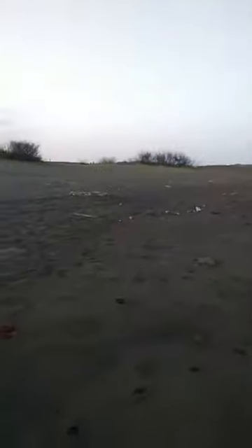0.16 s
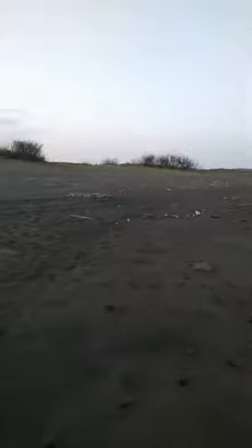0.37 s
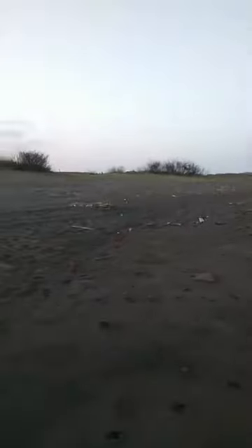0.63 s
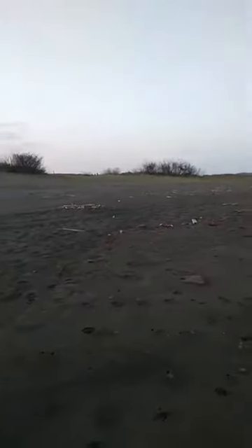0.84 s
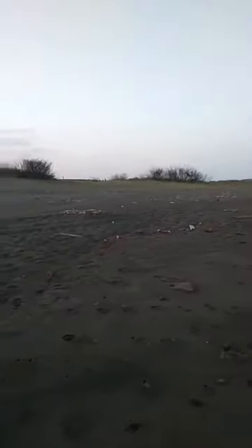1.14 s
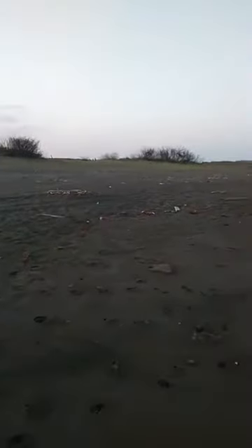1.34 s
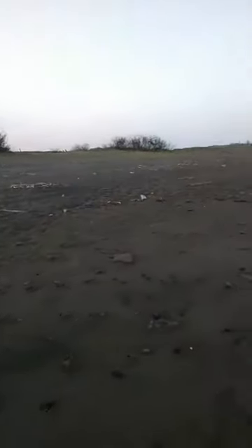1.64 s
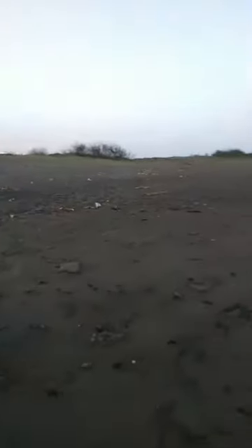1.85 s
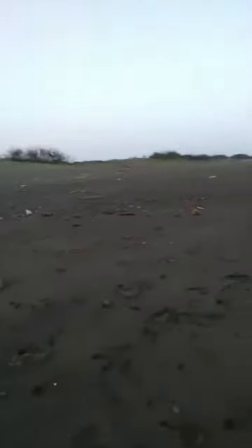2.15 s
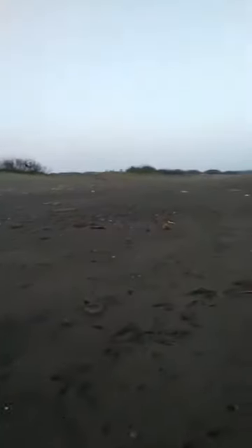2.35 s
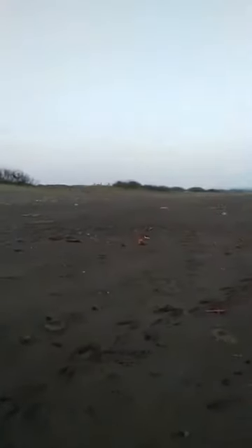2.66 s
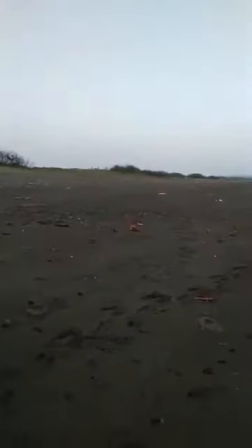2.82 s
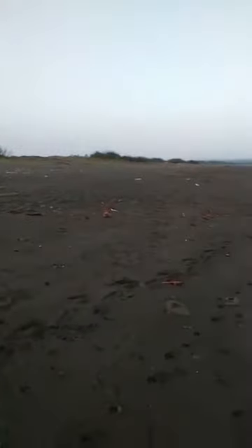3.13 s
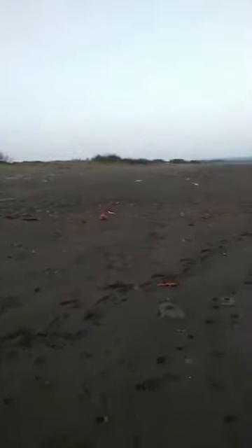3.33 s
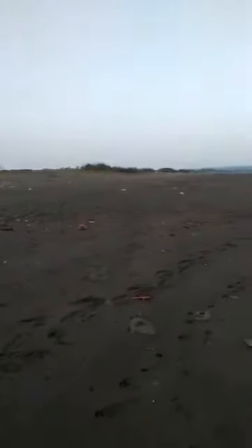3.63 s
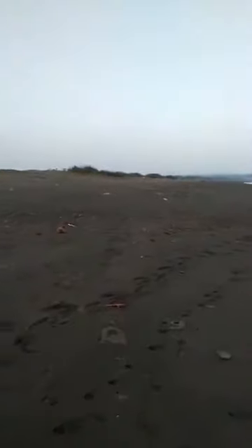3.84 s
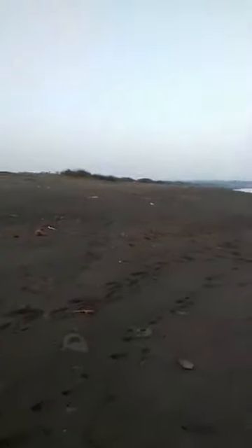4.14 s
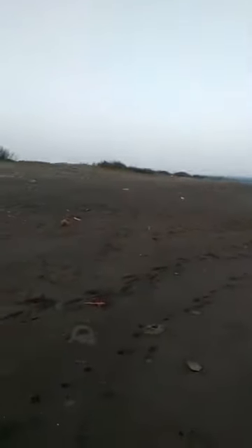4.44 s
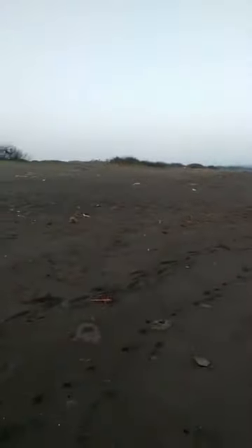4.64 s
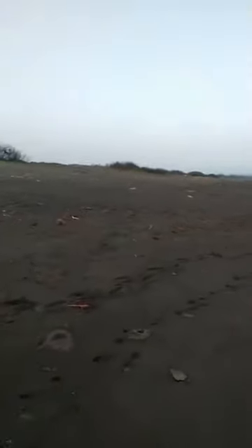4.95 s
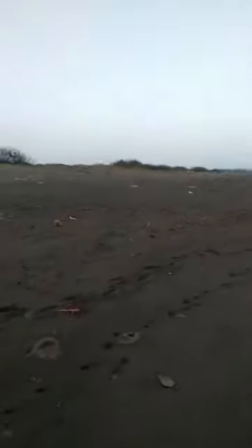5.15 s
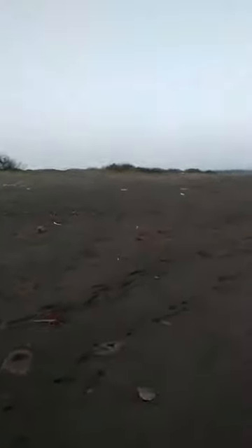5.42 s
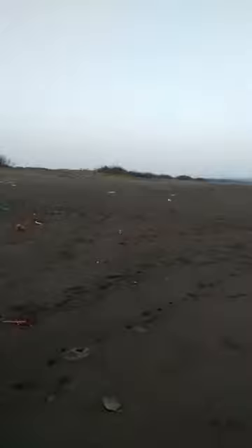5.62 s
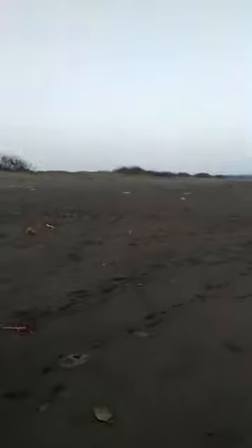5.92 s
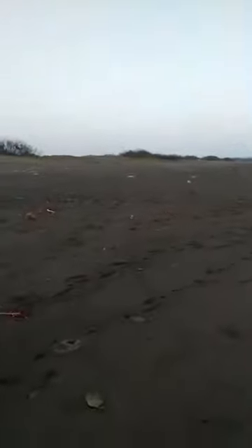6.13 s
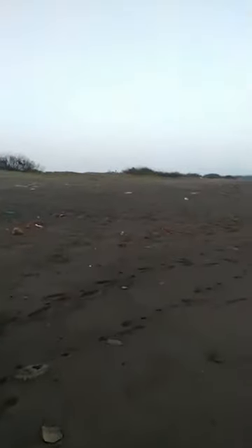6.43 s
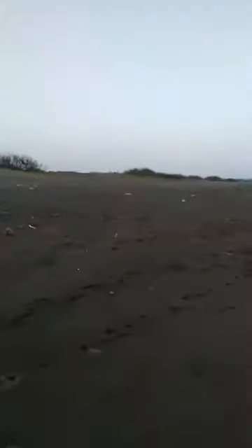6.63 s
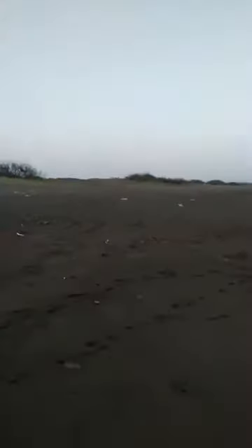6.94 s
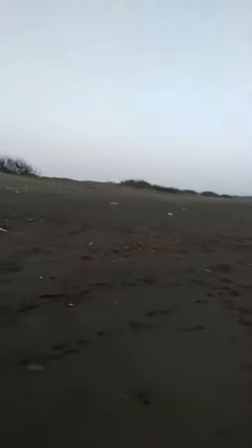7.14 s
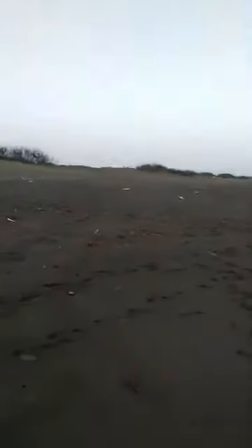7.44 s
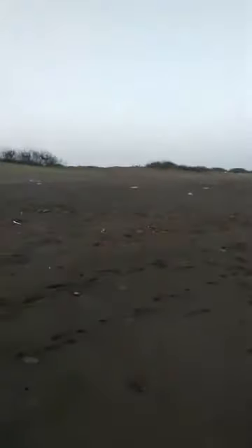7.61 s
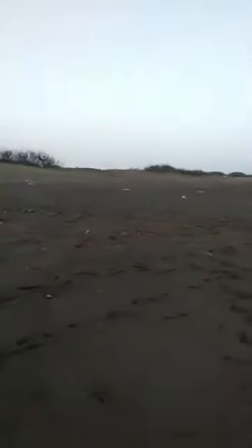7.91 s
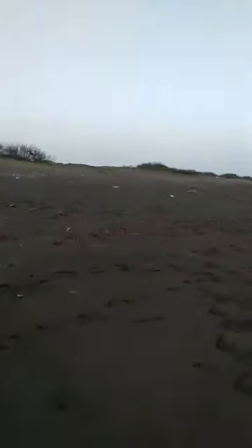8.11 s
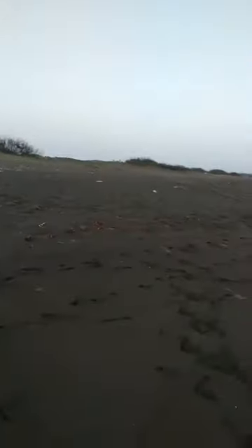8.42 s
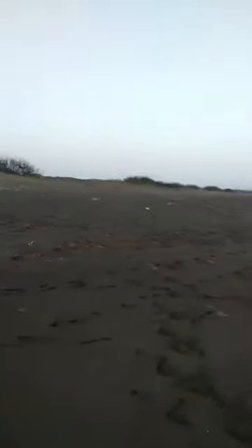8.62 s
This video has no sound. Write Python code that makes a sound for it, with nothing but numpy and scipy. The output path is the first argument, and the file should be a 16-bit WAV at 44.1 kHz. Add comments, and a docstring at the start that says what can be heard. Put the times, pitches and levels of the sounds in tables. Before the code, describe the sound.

Faint, slightly warbling surf is heard from some way up an open sandy beach. Wind rumbles on the microphone and a small bird chirps twice. Then waves break with a soft roar and low thuds, and water washes up with fizzing foam. The sea eases briefly and swells again near the end, with a few tiny ticks of sand.

```python
"""Faint surf first, warbling in the phone's noise suppression; wind buffets, a small bird calls twice.
Then the sea swells twice: breakers roar and thud with trapped bubbles, the wash runs up and foam fizzes.
A few sand grains tick. Heard in mono on a wide sandy beach, from a phone carried some way from the water;
the sand's reflection cuts moving hollows into the surf."""
import sys
import numpy as np
from scipy import signal
from scipy.fft import rfft, irfft, next_fast_len
from scipy.io import wavfile
from scipy.ndimage import uniform_filter1d

SR = 44100
rng = np.random.default_rng(int(sys.argv[2]) if len(sys.argv) > 2 else 0)


def log_audio(samples):
    """Write samples as a 16-bit WAV file to the path given in sys.argv[1]."""
    # one column per channel
    frames = np.atleast_2d(samples).T
    # limit to full scale, then quantise
    limited = np.clip(frames, -1, 1)
    pcm = np.round(limited * 32767).astype(np.int16)
    wavfile.write(sys.argv[1], SR, pcm)


N = 386757
FRAME, HOP = 1024, 256
FRAME_S = np.arange(-(-N // HOP) + 1) * HOP / SR
BIN_HZ = np.maximum(np.arange(FRAME // 2 + 1) * SR / FRAME, 1)[:, None]


def surf():
    """The sea from up the beach; in a lull, noise suppression narrows parts to their strongest bands."""
    hisses, fresh = surges()
    spray_gain, lull = spray(hisses, fresh)
    parts = [*breakers(lull), *low_thumps(), wash(lull), spray_gain, foam(hisses, lull)]
    gain = np.sqrt(sum(part ** 2 for part in parts))
    gain = gain * sand_reflection() * suppressor_warble(lull) * splashes()
    spectrum = signal.stft(bubbles(), nperseg=FRAME, noverlap=FRAME - HOP)[2]
    return signal.istft(spectrum * gain, nperseg=FRAME, noverlap=FRAME - HOP)[1][:N]


def bubbles(pop_share=0.16, spread_db=3.0, pops_per_s=2500):
    """Countless bursting bubbles: a smooth rush with slightly louder pops in it."""
    size = np.minimum(rng.exponential(size=N), 3.5)
    pops = rng.standard_normal(N) * undb(spread_db * size) * (rng.random(N) < pops_per_s / SR)
    rush = rng.standard_normal(N) + pop_share * pops / pops.std()
    return rush / rush.std()


CLOUD_HZ = 304.5
# A cloud of bubbles centred on CLOUD_HZ, out in the break: frequency_hz, relative_db
THUD_SPECTRUM = [(90, -37), (160, -17.5), (230, 1.5), (300, 0.5), (390, 3), (480, -24), (650, -43)]
# White water, some way off: frequency_hz, relative_db
ROAR_SPECTRUM = [(220, -49), (340, -13), (450, 6), (570, 4), (850, 4.5), (1100, 2), (1350, -3.5),
                 (2000, -42)]
# Waves breaking off the beach: arrival_s, hold_s, fade_s, roar_relative_db, thud_relative_db
BREAKERS = [(1.0, 0.28, .17, -67.5, -82), (1.45, .12, .1, -70.5, -88), (1.66, 0.079, 0.23, -56, -75),
            (2.014, .27, .13, -54.5, -73), (2.464, .06, .1, -59, -79), (2.607, 3.637, 0.94, -49, -51.5),
            (7.462, 1.4, 0.86, -50.5, -56)]


def breakers(lull, rise_s=0.12, deepen_s=0.11, thud_lag_s=0.55, thud_rise_s=0.46, thud_leaves_s=0.36):
    """A wave's roar deepens as its bubbles grow; in a long wave the thud builds later and dies sooner."""
    roars, thuds, lifts = [], [], []
    for s, hold_s, fade_s, roar_db, thud_db in BREAKERS:
        sag_db = 0.17 * np.maximum(FRAME_S - s, 0)
        roars.append(undb(roar_db - sag_db) * swell(s, rise_s, hold_s, fade_s))
        lifts.append(0.63 * np.exp(-np.maximum(FRAME_S - s + rise_s, 0) / deepen_s))
        thud_s = s + min(thud_lag_s, hold_s)
        body_s = max(hold_s - thud_lag_s - thud_leaves_s, 0)
        thuds.append(undb(thud_db - sag_db) * swell(thud_s, thud_rise_s, body_s, fade_s))
    lift_octaves = np.average(lifts, axis=0, weights=np.square(roars) + 1e-12)
    roar = colour(ROAR_SPECTRUM, BIN_HZ / 2 ** lift_octaves, contrast=1 + 2.8 * lull)
    # bigger clouds are louder and ring lower: an octave per 34 dB
    cloud_db = together(thuds)
    ring_hz = np.minimum(CLOUD_HZ * 2 ** ((-49.5 - cloud_db) / 34), 417)
    thud = colour(THUD_SPECTRUM, BIN_HZ * CLOUD_HZ / ring_hz, contrast=1 + 0.67 * lull)
    return thud * undb(cloud_db), roar * undb(together(roars) + 2.5)


# Falling crests, and one gust on the microphone near 7.6 s: peak_s, rise_and_fade_s, level_db, pitch_hz
LOW_THUMPS = [(1.217, 0.1, -55, 421), (1.59, 0.056, -58, 396), (1.996, 0.13, -53, 330),
              (2.723, 0.15, -51.5, 416), (3.174, 0.15, -47.5, 270), (3.65, 0.051, -53, 234),
              (3.93, 0.066, -48, 276), (4.12, 0.073, -44.5, 222), (4.6, 0.23, -46.5, 272),
              (4.773, .09, -48, 230), (5.253, 0.63, -49, 273), (6.45, .08, -62, 370),
              (6.644, 0.17, -55.5, 340), (7.638, 0.054, -51, 175), (7.818, 0.11, -50, 250),
              (8.01, 0.2, -52.5, 215), (8.53, 0.13, -52.5, 283)]


def low_thumps():
    """Low thumps: falling crests that each trap a big cloud of bubbles, and one gust on the microphone."""
    return [colour(THUD_SPECTRUM, BIN_HZ * CLOUD_HZ / hz) * swell(s, fade_s, 0, fade_s) * undb(db)
            for s, fade_s, db, hz in LOW_THUMPS]


# Wash at the water's edge: frequency_hz, relative_db
WASH_SPECTRUM = [(800, -26), (1050, -3.5), (1300, -1), (1560, 0.5), (1850, -1), (2200, -0.5), (2450, -1.5),
                 (2750, -10), (3600, -23)]
# Its rise and fall from up the beach: time_s, relative_db
WASH_LEVELS = [(0, -53), (.2, -57), (.45, -61), (.9, -58), (1.1, -53), (1.35, -54), (1.55, -50.5),
               (2.07, -43.5), (2.3, -45.5), (3.9, -40.5), (4.3, -42.5), (5.45, -42), (6.95, -47.5),
               (7.15, -56), (7.5, -47.5), (8.77, -43)]


def wash(lull):
    """Water runs up the sand; in a lull the phone's noise suppression leaves only its strongest bands."""
    level_db = curves(WASH_LEVELS)[0] - 2.1
    return colour(WASH_SPECTRUM, contrast=1 + 4.4 * lull) * undb(level_db)


# Spray above the breakers: frequency_hz, relative_db
SPRAY_SPECTRUM = [(800, -52), (1200, -7.5), (2400, 0.5), (2800, -0.5), (3700, 0.5), (4400, -1.05),
                  (5800, -2), (7000, 1), (8000, 5.5), (10500, -1), (12500, -9.5), (13200, -8), (16000, -21)]
# Its rise and fall from up the beach: time_s, relative_db
SPRAY_LEVELS = [(0, -68), (.52, -79), (1.04, -62.5), (1.3, -83), (1.45, -59), (1.7, -51), (2.35, -51),
                (3.6, -47.5), (5.45, -48.5), (6.6, -52.5), (7.13, -52.5), (7.35, -46.5), (7.6, -45.5),
                (8.1, -48), (8.77, -48.5)]


def spray(hisses, fresh):
    """Thrown spray sounds brighter when faint or fresh; a lull (0-1) sets in as it dies down."""
    level_db = together([undb(curves(SPRAY_LEVELS)[0]), undb(-15.5) * sum(hisses)])
    lull = np.clip((-50.5 - uniform_filter1d(level_db, size=30)) / 17, 0, 1)
    db_per_octave = -2 + 6 * lull + 3 * fresh
    tilt_db = db_per_octave * np.log2(np.clip(BIN_HZ, 2500, 9000) / 6000)
    return colour(SPRAY_SPECTRUM) * undb(level_db + tilt_db + 8.5), lull


# Foam along the waterline: frequency_hz, relative_db
FOAM_SPECTRUM = [(5500, -72), (7300, -25), (7900, 2.5), (8600, 9.5), (9300, 7), (9950, 4.5), (10350, -9.5),
                 (12500, -13.5), (13200, -35), (14100, -28), (14900, -9.5), (16000, -14)]
# Its rise and fall from up the beach: time_s, relative_db
FOAM_LEVELS = [(0, -46), (.2, -44), (.37, -49.5), (.63, -43), (1.05, -48), (1.4, -47), (1.95, -38.5),
               (2.3, -42.5), (2.85, -43), (3.1, -39), (4.8, -40.5), (6.1, -43), (7.0, -39.5), (8.1, -40.5),
               (8.77, -41)]


def foam(hisses, lull):
    """Foam fizzes on the sand, with the surges of hiss on top."""
    level_db = together([undb(curves(FOAM_LEVELS)[0]), *hisses]) - .6
    return colour(FOAM_SPECTRUM, contrast=1 + 0.025 * lull) * undb(level_db)


# Sudden hiss from the shoreline: arrival_s, hold_s, relative_db
HISS_SURGES = [(1.63, .03, -43), (2.496, 0.035, -40.5), (2.58, .02, -37.5), (2.93, 0.04, -40),
               (7.57, 0.069, -37)]


def surges(rise_s=.05, fade_s=0.15, fresh_s=0.36):
    """The gain of each surge of hiss, and how fresh (0-1) the spray is around them."""
    hisses = [undb(db) * swell(s, rise_s, hold_s, fade_s) for s, hold_s, db in HISS_SURGES]
    fresh = np.max([np.exp(-np.abs(FRAME_S - s) / fresh_s) for s, _, _ in HISS_SURGES], axis=0)
    return hisses, fresh


# The main hollow along the walk over the sand: time_s, centre_hz, nominal_depth_db
HOLLOW_PATH = [(0, 1030, 25), (1.05, 890, 14), (1.5, 770, 0.5), (3.8, 740, 2), (4.5, 700, 4.5),
               (5.2, 720, 3.5), (5.7, 835, 3.5), (6.35, 980, 13.5), (7.0, 1060, 22), (7.45, 1100, 1)]
# That hollow and two fainter ones at the microphone: centre_multiple, width_hz, depth_share
HOLLOW_SHAPES = [(1, 125, 0.89), (4.1, 170, 0.093), (6.7, 380, 0.27)]


def sand_reflection():
    """Direct and sand-reflected sound cancel in bands that move as the phone is carried along."""
    centre_hz, depth_db = curves(HOLLOW_PATH)
    hollows = sum(share * np.exp(-.5 * ((BIN_HZ - multiple * centre_hz) / width_hz) ** 2)
                  for multiple, width_hz, share in HOLLOW_SHAPES)
    return undb(-depth_db * hollows)


# Warble of the phone's noise suppression, by band: frequency_hz, nominal_swing_db
WARBLE_BANDS = [(500, 8), (1500, 4), (2300, 4.5), (2900, 13.5), (7200, 8.5), (8500, 3.5), (10500, 4),
                (15000, 9)]


def suppressor_warble(lull):
    """The phone's noise suppression makes faint surf warble in patches, at about the same mean power."""
    swing_db = (0.11 + 2.24 * lull) * np.interp(BIN_HZ, *np.transpose(WARBLE_BANDS))
    warble = undb(swing_db * np.tanh(patches(width_hz=38, life_s=0.044)))
    return warble / np.sqrt(np.cosh(np.log(undb(swing_db))))


def splashes():
    """Splashes flicker over wide bands; low down, single clouds of bubbles throb."""
    splash_db = 0.78 * patches(width_hz=1300, life_s=0.007) + .5 * patches(width_hz=3100, life_s=0.03)
    throb_db = 2.14 * patches(width_hz=31, life_s=0.022) / (1 + (BIN_HZ / 1100) ** 2)
    return undb(splash_db + throb_db)


# Rumble right at the microphone: frequency_hz, relative_db
EDDY_SPECTRUM = [(20, -31), (42, -12), (65, 1.5), (90, 3.5), (120, 4.5), (165, -5), (230, -20), (330, -40),
                 (600, -58)]
# Gusts striking the microphone: peak_s, fade_s, level_db
MICROPHONE_GUSTS = [(.1, 0.17, -51.5), (.25, .18, -50), (.4, .15, -48.5), (.49, .15, -50.5),
                    (.69, 0.18, -48), (.76, 0.16, -51), (2.28, .1, -67), (3.1, .08, -64), (3.64, .1, -63),
                    (4.11, .12, -67), (4.77, 0.11, -58), (4.98, .12, -61.5), (5.19, 0.078, -48),
                    (5.33, 0.11, -63), (5.689, 0.1, -68), (6.22, .07, -61), (7.63, .13, -61),
                    (8.05, 0.092, -67), (8.36, 0.1, -63)]


def wind(rise_s=0.058, breeze_db=-74, wander_db=1.5):
    """Eddies at the microphone port: a low rumble from a wandering breeze and short gusts."""
    eddies = noise(EDDY_SPECTRUM)
    eddies /= np.sqrt(uniform_filter1d(eddies ** 2, size=3000))
    breeze = undb(breeze_db + wander_db * patches(width_hz=100, life_s=0.015)[0])
    gusts = [undb(db) * swell(s, rise_s, 0, fade_s) for s, fade_s, db in MICROPHONE_GUSTS]
    return eddies * undb(np.interp(np.arange(N) / SR, FRAME_S, together([breeze, *gusts])))


# A small bird over the dunes: start_s, start_pitch_hz, end_pitch_hz, level_db
BIRD_CALLS = [(0.324, 5080, 4200, -45), (.915, 5240, 3900, -46)]


def bird(fall_s=.022, rise_s=0.014, fade_s=0.033, rasp_hz=220):
    """Short raspy chirps that drop in pitch and fade."""
    out = np.zeros(N)
    t = np.arange(SR // 4) / SR
    lowpass = signal.butter(2, rasp_hz, fs=SR)
    envelope = (1 - np.exp(-(t / rise_s) ** 2)) * np.exp(-t / fade_s)
    for s, start_hz, end_hz, db in BIRD_CALLS:
        pitch_hz = end_hz + (start_hz - end_hz) * np.exp(-t / fall_s)
        rasp = signal.lfilter(*lowpass, rng.standard_normal(len(t)) + 1j * rng.standard_normal(len(t)))
        call = np.real(rasp / rasp.std() * np.exp(2j * np.pi * np.cumsum(pitch_hz) / SR))
        add(out, s, undb(db) * call * envelope / envelope.max())
    return out


# Sand grains, heard at the phone: start_s, level_db
GRAIN_TICKS = [(1.626, -32), (2.482, -35), (7.62, -29), (7.755, -35)]


def sand(decay_s=.004):
    """Brief bright ticks of grit."""
    envelope = np.zeros(N)
    for s, db in GRAIN_TICKS:
        add(envelope, s, undb(db) * np.exp(-np.arange(SR // 20) / SR / decay_s))
    return envelope * noise([(2000, -18), (6000, -13), (8800, 1), (11000, -1), (16000, -17)])


# The quiet of the open beach: frequency_hz, relative_db
BACKGROUND_SPECTRUM = [(20, -41), (100, 2.5), (250, 2.5), (450, -5), (1000, -5), (4000, -8.5), (16000, -27)]


def background(level_db=-71.5):
    """A faint, steady hush under everything."""
    return undb(level_db) * noise(BACKGROUND_SPECTRUM)


def undb(db):
    """Decibels to gain."""
    return 10 ** (np.asarray(db) / 20)


def together(gains):
    """Level in dB of unrelated sounds heard at once."""
    return 10 * np.log10(sum(g ** 2 for g in gains) + 1e-12)


def curves(table):
    """The columns of a table, joined by straight lines in time."""
    s, *columns = np.transpose(table)
    return [np.interp(FRAME_S, s, column) for column in columns]


def swell(s, rise_s, hold_s, fade_s):
    """A gain that rises to 1 at time s, holds and fades; rise and fade each span 20 dB."""
    early = np.maximum(s - FRAME_S, 0) / rise_s
    late = np.maximum(FRAME_S - s - hold_s, 0) / fade_s
    return undb(-20 * (early ** 2 + late ** 2))


def colour(points, hz=BIN_HZ, contrast=1):
    """Gain at each frequency, keeping white noise at unit power; contrast deepens the valleys."""
    point_hz, db = np.transpose(points)
    rolloff_db = 80 * np.maximum(np.log2(hz / point_hz[-1]), 0)
    gain = undb(contrast * np.interp(np.log(hz), np.log(point_hz), db) - rolloff_db)
    return gain / np.sqrt(np.mean(gain ** 2, axis=0))


def noise(points):
    """Steady noise of a given colour, rms 1."""
    size = next_fast_len(N)
    hz = np.maximum(np.arange(size // 2 + 1) * SR / size, 1)
    return irfft(rfft(rng.standard_normal(size)) * colour(points, hz), size)[:N]


def blur(field, width, axis):
    """Gaussian smoothing along one axis, width in cells."""
    size = field.shape[axis]
    window = np.exp(-2 * (np.pi * width * np.arange(size // 2 + 1) / size) ** 2)
    return irfft(rfft(field, axis=axis) * np.expand_dims(window, 1 - axis), size, axis=axis)


def patches(width_hz, life_s):
    """Random swells of a given bandwidth and lifetime, spread 1."""
    field = rng.standard_normal((FRAME // 2 + 28, next_fast_len(len(FRAME_S))))
    field = blur(field, width_hz * FRAME / SR, axis=0)
    field = blur(field, life_s * SR / HOP, axis=1)
    return field[:len(BIN_HZ), :len(FRAME_S)] / field.std()


def add(out, s, sound):
    """Mix a short sound in at time s."""
    start = int(s * SR)
    out[start:start + len(sound)] += sound[:N - start]


def scene():
    """Sea, wind and small sounds at one microphone, the same in both channels."""
    mono = surf() + wind() + bird() + sand() + background()
    return np.array([mono, mono])


def record(dry):
    """The phone cuts steeply above 15.8 kHz."""
    return signal.sosfilt(signal.ellip(12, .2, 80, 15800, fs=SR, output="sos"), dry)


dry = scene()
out = record(dry)
log_audio(out)
```